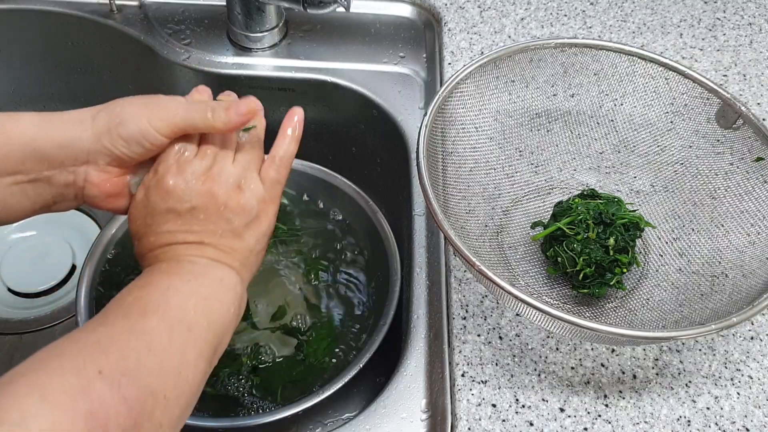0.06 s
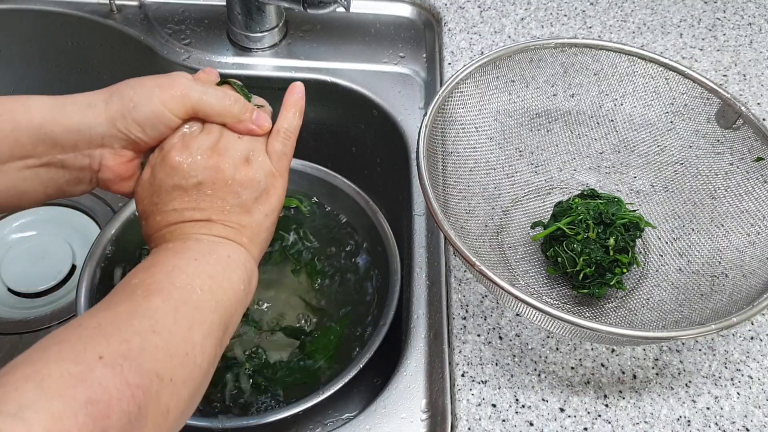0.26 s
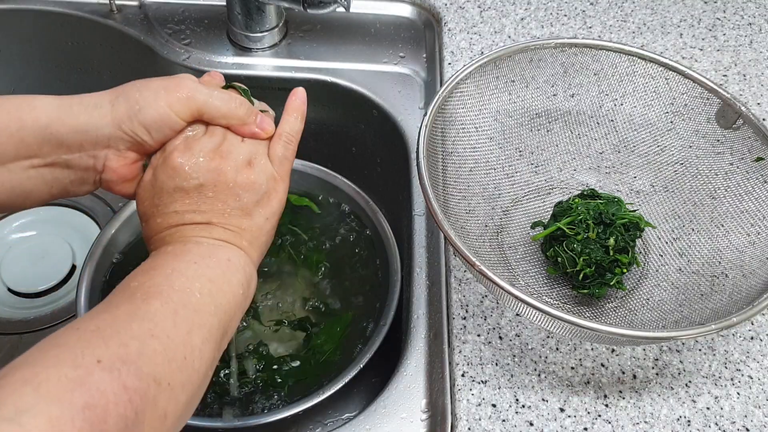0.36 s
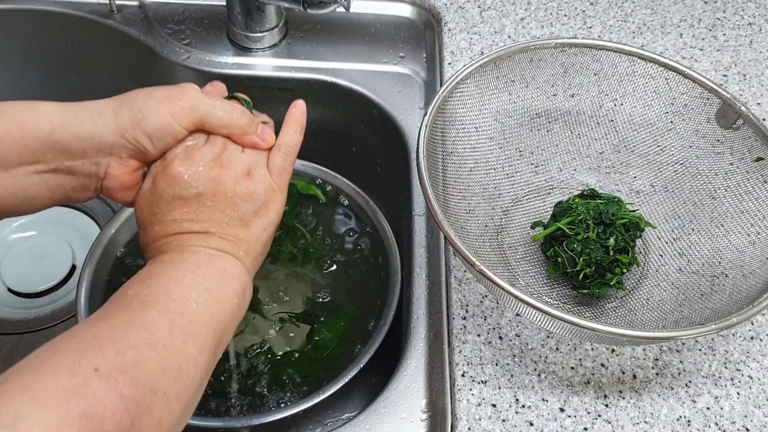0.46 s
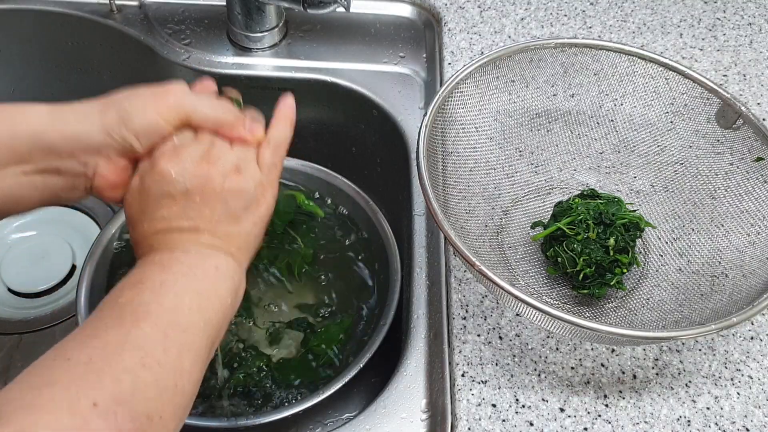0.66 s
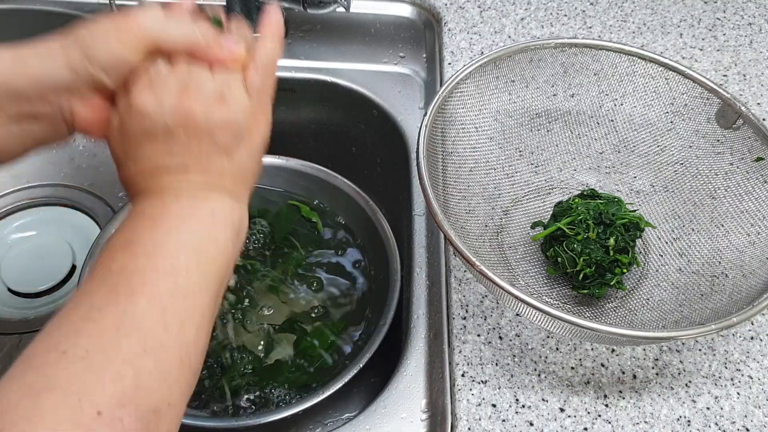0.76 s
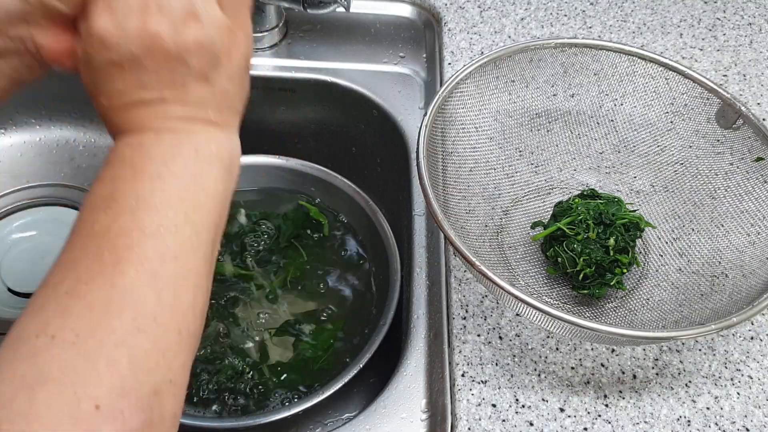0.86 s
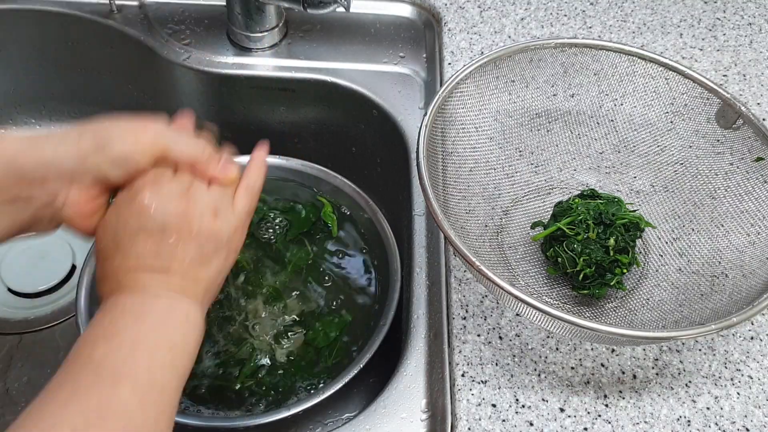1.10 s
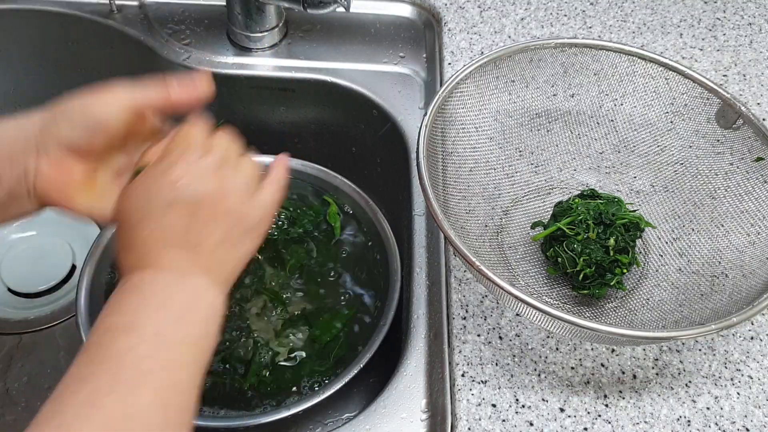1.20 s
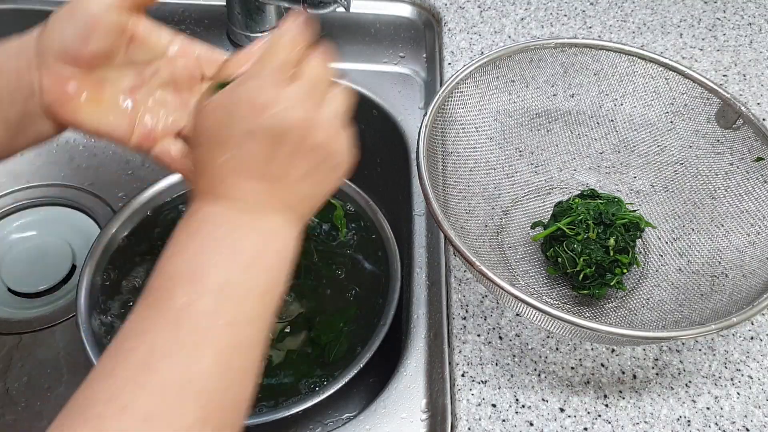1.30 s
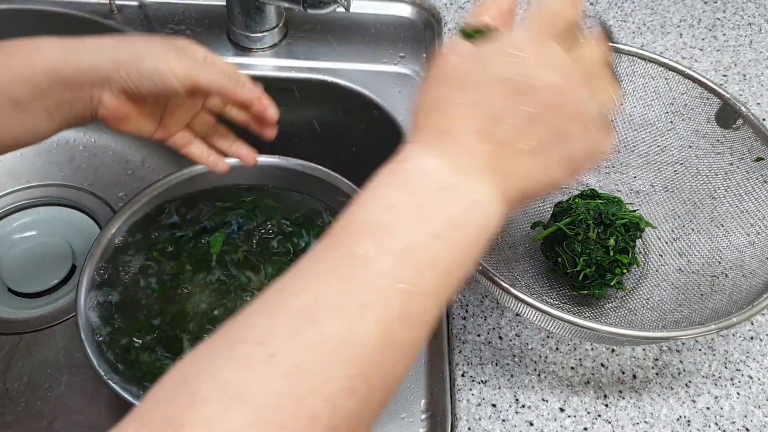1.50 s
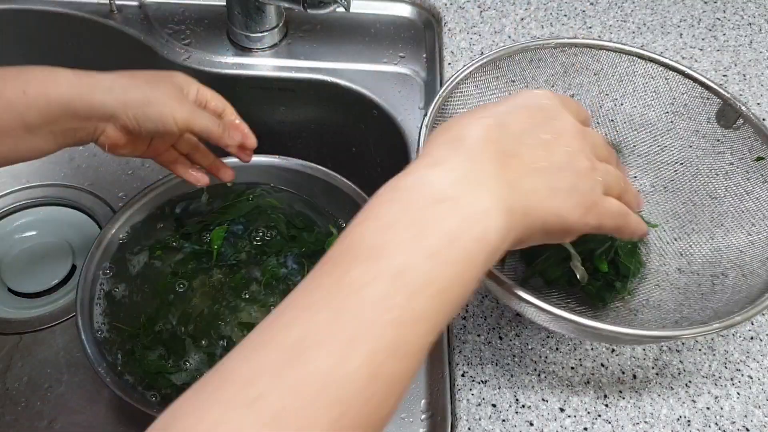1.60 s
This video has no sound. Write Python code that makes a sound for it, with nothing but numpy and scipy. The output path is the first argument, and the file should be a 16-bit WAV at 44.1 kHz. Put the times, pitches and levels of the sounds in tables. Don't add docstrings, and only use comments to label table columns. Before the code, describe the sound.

Water drips and splashes from hand-squeezed wet leaves into a full steel bowl in a sink: quiet start, a busy cluster of bubbly plops and trickling, then sparse snaps and fading drips, close stereo microphone.

```python
import sys
import numpy as np
from scipy import signal
from scipy.fft import rfft, irfft, next_fast_len
from scipy.io import wavfile
from scipy.ndimage import uniform_filter1d

SR = 44100
rng = np.random.default_rng(int(sys.argv[2]) if len(sys.argv) > 2 else 0)


def undo_db(level):
    steps = np.asarray(level, float) / 20
    return 10 ** steps


def to_wav(s):
    ch = np.atleast_2d(s).T
    pcm = np.round(np.clip(ch, -1, 1) * 32767)
    wavfile.write(sys.argv[1], SR, pcm.astype(np.int16))


N = 72765
RIGHT_LAG = 4


def evened(x):
    return x / np.sqrt(np.mean(x ** 2) + 1e-20)


def read(points, hz):
    f, value = np.transpose(points)
    return np.interp(np.log(hz + 1), np.log(f + 1), value)


def add(mix, start_s, sound):
    part = mix[round(start_s * SR):][:len(sound)]
    part += sound[:len(part)]


def bubble(level_db, pitch_hz, t60_s, glide, rise_cycles=.5):
    wobble, steady_hz = 0.027, 2200
    flutter_db, calm_cycles = 4.5, 17
    t = np.arange(0, t60_s, 1 / SR)
    shake = evened(uniform_filter1d(rng.standard_normal(20000), size=150))[:len(t)]
    climb = 1 + glide * (100 * t) ** 2
    pitch = pitch_hz * (climb + wobble * min(pitch_hz / steady_hz, 1) * shake)
    turns = np.cumsum(np.minimum(pitch, 17000)) / SR
    flutter = flutter_db * np.minimum(t * pitch_hz / calm_cycles, 1) * shake[::-1]
    decay = undo_db(level_db - 60 * t / t60_s + flutter)
    rise = 1 - np.exp(-t * pitch_hz / rise_cycles)
    unburst = climb < 1.9
    return unburst * decay * rise * np.sin(2 * np.pi * turns)


# start_s [s], level_db [peak dB], pitch_hz [Hz], t60_s [s],
# glide [0-1 per 10 ms]
PLOPS = [(.210, -41, 765, .17, 0.014), (.277, -54, 2620, .03, 0), (.297, -46, 2640, 0.05, 0.005),
         (.316, -29.5, 2470, 0.035, 0.11), (.3365, -22.5, 1680, .018, .004),
         (.341, -41.5, 1564, 0.032, .004), (.360, -42, 1950, .03, 0), (.362, -42, 1550, .04, 0),
         (.398, -44, 1950, .06, .02), (0.458, -37, 940, 0.035, 0.02), (.457, -40.5, 1510, .03, .004),
         (0.469, -43, 1010, 0.03, .01), (.5102, -27, 745, 0.09, 0.004), (.558, -46, 740, .04, 0.01),
         (.612, -34, 770, 0.03, 0.01), (.636, -54, 767, 0.19, 0), (0.742, -32.5, 1620, 0.021, 0),
         (.766, -49, 1000, .03, 0.05), (.810, -36, 2035, 0.03, 0.01), (.818, -36, 2050, .025, .01),
         (0.85, -47.5, 1506, .05, .004), (.850, -43, 1184, 0.042, 0.03), (.964, -56.5, 995, 0.17, .002),
         (.964, -58.5, 1417, 0.063, 0.05), (1.303, -54, 1600, .04, 0), (1.344, -46, 2000, .022, 0),
         (1.36, -53, 1800, .025, 0), (1.37, -53, 1800, .025, 0), (1.366, -61, 880, .06, .03),
         (1.378, -61, 980, .05, 0)]
# start_s [s], level_db [peak dB], pitch_hz [Hz], t60_s [s], glide [0-1 per 10 ms]
SNAPS = [
    (.258, -60, 1150, 0.06, 0.2),
    (1.2306, -21, 4720, 0.0055, 0.3),
    (1.2311, -24.5, 7140, 0.0056, .01),
    (0.6676, -29, 8260, 0.0093, 0),
    (0.9094, -33, 6550, 0.0045, 0),
    (1.1695, -27, 7340, .005, 0),
]


def ringing_drops():
    drops = np.zeros(N)
    for start_s, *row in PLOPS + SNAPS:
        add(drops, start_s, bubble(*row))
    return drops


def burst(level_db, pitch_hz, count=16):
    length_s, fade_db, spread, cycles = 0.024, -14, .1, 26
    out = np.zeros(round(length_s * SR) + 4000)
    luck = rng.random((count, 2))
    luck[0] = 0
    for late, tune in luck:
        pitch = pitch_hz * (1 + spread * np.sin(2 * np.pi * tune))
        level = level_db + fade_db * np.sqrt(late)
        add(out, late * length_s, bubble(level, pitch, cycles / pitch_hz, .02, rise_cycles=1.5))
    return out


# start_s [s], level_db [peak dB], pitch_hz [Hz]
PINGS = [(.1755, -49, 5600), (.2683, -39, 4600), (.3212, -33, 4400), (.323, -30.5, 3700),
         (.4633, -29, 2700), (.4633, -29.5, 3430), (.4508, -37.5, 3200), (.475, -39, 3000),
         (.485, -35.5, 3000), (.500, -37, 3150), (.530, -48, 3450), (.548, -38.5, 3050), (.4923, -28, 3370),
         (.5107, -31, 3500), (.5482, -29, 6100), (.5796, -45, 3160), (.6669, -29.5, 8000),
         (.6673, -31, 5500), (0.85, -42, 3100), (.8155, -36, 3830), (.829, -37, 2700), (.822, -37.5, 2200),
         (.851, -43, 1410), (.343, -38, 1700), (.3155, -29.5, 2304), (.8879, -32.5, 3550),
         (.8941, -40, 3700), (.908, -39, 3600), (.9078, -42, 2540), (.9577, -31, 3700),
         (.9577, -37.5, 4200), (.9577, -31.5, 6900), (1.170, -29.5, 5300), (1.169, -27.5, 6800),
         (1.128, -47, 4560), (1.236, -33.5, 4400), (1.314, -38, 3900), (1.338, -44, 4450)]


def add_pings(ear, lag_s):
    for start_s, *row in PINGS:
        add(ear, start_s + lag_s, burst(*row))


def slap(level_db, centre_hz, t60_s):
    tick, spray_db, lumps_db, mist_db, mist_hz = 4.6, -5, 3.93, -22, 9000
    t = np.arange(0, t60_s, 1 / SR)
    noise, lumps = rng.standard_normal((2, 20000))[:, :len(t)]
    lumps = evened(uniform_filter1d(lumps, size=40))
    spray = noise * undo_db(spray_db - 60 * t / t60_s + lumps_db * lumps)
    spray = spray + tick * (t == 0)
    edges_hz = [centre_hz / 2.03, min(centre_hz * 1.8, 18000)]
    band = signal.butter(4, edges_hz, "bandpass", fs=SR, output="sos")
    top = signal.butter(4, mist_hz, "highpass", fs=SR, output="sos")
    mist = undo_db(mist_db) * (centre_hz > 5000) * signal.sosfilt(top, spray)
    return undo_db(level_db) * (signal.sosfilt(band, spray) + mist)


# [s, spray]
SLAPS = [(.0209, -44, 9600, 0.11), (.1935, -43, 9800, 0.07), (.2244, -42, 11600, 0.23),
         (0.3159, -17.5, 3410, 0.039), (0.317, -38.5, 12000, 0.088), (.336, -32.5, 3060, 0.12),
         (.4459, -40, 9300, 0.35), (.4633, -41, 7500, 0.049), (.4923, -44, 6440, 0.081),
         (.5107, -34, 8140, 0.089), (0.5102, -33, 1330, 0.033), (.612, -38, 9500, 0.09),
         (.6669, -54, 8850, 0.07), (.7033, -35.5, 3070, 0.26), (.7751, -39.5, 8600, 0.039),
         (.810, -39, 8600, 0.21), (.849, -47, 8100, 0.21), (.9078, -42, 6270, 0.1),
         (.9577, -40.5, 7960, 0.14), (1.168, -35.5, 8800, 0.032), (1.2303, -28, 5600, 0.025),
         (1.148, -43, 620, 0.45), (1.21, -38, 655, 0.23), (1.215, -39.5, 9900, 0.42),
         (1.27, -44, 9250, 0.17), (1.30, -53, 2230, 0.28)]


def add_slaps(ear, lag_s):
    for start_s, *row in SLAPS:
        add(ear, start_s + lag_s, slap(*row))


# [dB, heaviness of the drops]
FLOW = [(0, -55, 0.5), (.06, -63.5, -6), (0.169, -61, -15.5), (.26, -65, -10), (.36, -51, 7.5),
        (.50, -50, 1.5), (.62, -50.5, -1.5), (.70, -47, -0.5), (.76, -52.5, 9.5), (.86, -61, 2),
        (.94, -59.5, -3), (1.05, -59.5, -45), (1.14, -57, -27), (1.222, -50, 3.5), (1.321, -48, -5),
        (1.398, -62, 11), (1.478, -98, -22), (1.65, -100, -10)]
# pitch_hz [Hz], level_db [dB]
FIZZ = [(1100, -5), (2000, -3.5), (3500, 0.5), (6000, -0.5), (8000, 0.5), (11000, -6.5), (15500, -4.5)]


def fizz():
    level_db, pops_per_s, spread_db, cycles, heavy_hz = 0.5, 16000, 3.5, 8.2, 4100
    start_s, flow_db, weight_db = np.transpose(FLOW)
    t, out = np.arange(N) / SR, np.zeros((2, N))
    pitches = np.geomspace(1100, 15500, num=36)
    for hz in pitches:
        draw, size, side = rng.random(N), rng.exponential(1, N), rng.random(N)
        popping = draw < pops_per_s / SR * hz / pitches.sum()
        pops = popping * undo_db(spread_db * np.minimum(size, 5))
        heavy = 1 / (1 + (hz / heavy_hz) ** 4)
        level = undo_db(read(FIZZ, hz) + np.interp(t, start_s, flow_db + heavy * weight_db))
        grain = bubble(0, hz, 3 * cycles / hz, 0.21, rise_cycles=0.63)
        grain = grain / np.linalg.norm(grain)
        for ear, share in enumerate((side, 1 - side)):
            out[ear] += level * signal.oaconvolve(pops * np.sqrt(share), grain)[:N]
    return undo_db(level_db) * out


def echoes(start, gap, decay):
    taps = np.zeros((2, SR // 2))
    at = np.arange(start, SR // 2 - gap, gap)
    at = at + rng.integers(0, gap, (2, len(at)))
    np.put_along_axis(taps, at, rng.choice([-1., 1.], at.shape), 1)
    hz, t, z = signal.stft(taps, SR, nperseg=128)
    fade = undo_db(-60 * t / read(decay, hz)[:, None])
    tail = signal.istft(z * fade, SR, nperseg=128)[1]
    return tail / np.linalg.norm(tail[0])


# frequency_hz [Hz], t60_s [s]
KITCHEN = [(500, 0.53), (2000, 0.32), (5000, 0.34), (15000, 0.19)]


def reflections(sent):
    basin_db, basin_s, kitchen_db = -2.5, 0.02, -3.5
    out = np.zeros((2, N))
    for k in range(3):
        place = np.sqrt(2 / 3) * np.sin(np.pi * (7 * np.arange(N) / SR + k / 3))
        basin = undo_db(basin_db) * echoes(40, 16, [(100, basin_s * 3), (9000, basin_s)])
        space = basin + undo_db(kitchen_db) * echoes(150, 12, KITCHEN)
        out += signal.fftconvolve((place * sent)[None], space, axes=1)[:, :N]
    return out


# frequency_hz [Hz], likeness [0-1, left to right]
SAME = [(60, 0.92), (300, 0.82), (700, 0.41), (1500, 0.13), (4000, 0.067), (12000, 0.034)]


def steady(points, level_db, patchy_db):
    frames, hz = N // 256 + 5, np.fft.rfftfreq(1024, 1 / SR)
    a, b, c, d, patch = rng.standard_normal((frames, 513, 5)).T
    patch = uniform_filter1d(uniform_filter1d(patch, size=8, axis=0), size=12, axis=1)
    patch = evened(patch)
    same = np.clip(read(SAME, hz), -1, 1)[:, None]
    left = a + 1j * b
    right = same * left + np.sqrt(1 - same ** 2) * (c + 1j * d)
    z = np.array([left, right]) * undo_db(patchy_db * patch)
    white = signal.istft(z, nperseg=1024, noverlap=768)[1][:, :N]
    hz = np.fft.rfftfreq(N, 1 / SR)
    shape = undo_db(read(points, hz) - 60 * (hz > 1.2 * points[-1][0]))
    return undo_db(level_db) * evened(irfft(rfft(white) * shape, N))


# frequency_hz [Hz], density_db [dB per Hz]
HUM = [(25, -23), (50, -0.5), (70, 4.5), (86, -1.5), (220, -14), (440, -7), (750, -17), (1300, -44)]


def hum():
    return steady(HUM, -58.5, 1.2)


# frequency_hz [Hz], density_db [dB per Hz]
HISS = [(900, -12), (2000, -14), (3100, -18), (3600, -18), (4500, -10), (6500, -4.5), (8500, -5),
        (11500, -6), (16000, -8.5)]


def hiss():
    return steady(HISS, -66.5, 1.5)


def scene():
    bubble_send = .55
    drops = ringing_drops()
    near = np.array([drops, np.roll(drops, RIGHT_LAG)]) + fizz()
    for ear, lag_s in zip(near, (0, RIGHT_LAG / SR)):
        add_slaps(ear, lag_s)
        add_pings(ear, lag_s)
    sent = near.mean(0) - (1 - bubble_send) * drops
    return near + reflections(sent) + hum() + hiss()


def roll_off(x):
    return signal.sosfilt(signal.butter(12, 16990, fs=SR, output="sos"), x)


# frequency_hz [Hz], level_db [dB]
MIC = [(500, 0.85), (3000, 3), (7300, 5), (8600, -2.5), (9800, 2), (11500, 5), (15800, 0)]
# frequency_hz [Hz], left_minus_right_db [dB]
LEFT = [(80, 2.5), (300, -0.3), (700, 3), (1400, 2.1), (3000, 1.5), (9000, 2.5), (13000, -0.2)]


def record(dry):
    edge_hz = 15900
    size = next_fast_len(N + 4096)
    hz = np.fft.rfftfreq(size, 1 / SR)
    balance = np.array([[.5], [-.5]]) * read(LEFT, hz)
    colour = undo_db(read(MIC, hz) + balance) / (1 + (hz / edge_hz) ** 200)
    mix = irfft(rfft(dry, size) * colour, size)[:, :N]
    return roll_off(mix)


dry = scene()
out = record(dry)
to_wav(out)
```